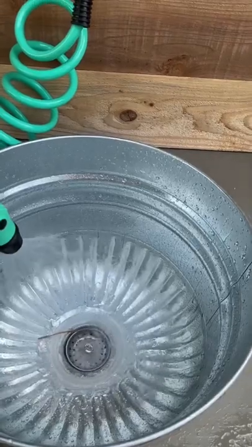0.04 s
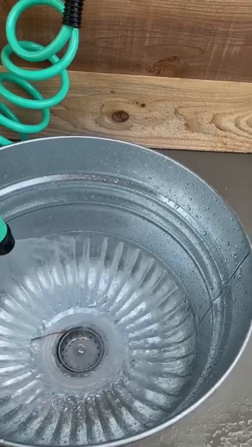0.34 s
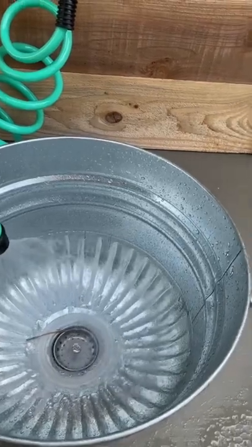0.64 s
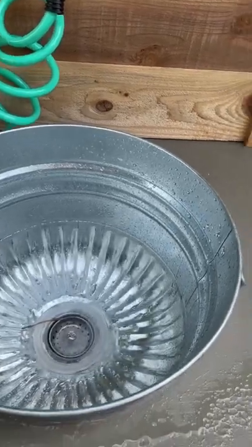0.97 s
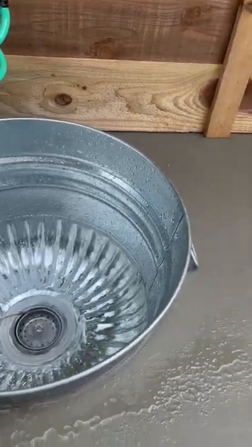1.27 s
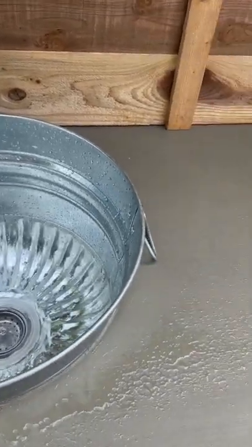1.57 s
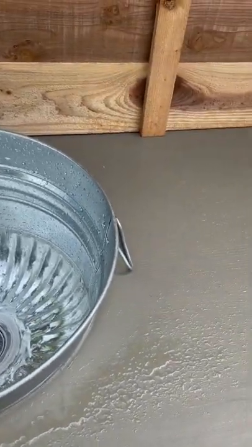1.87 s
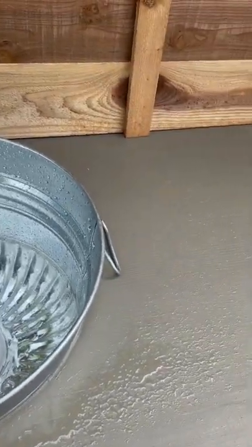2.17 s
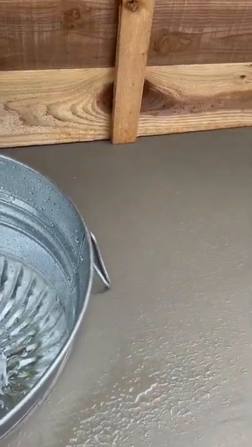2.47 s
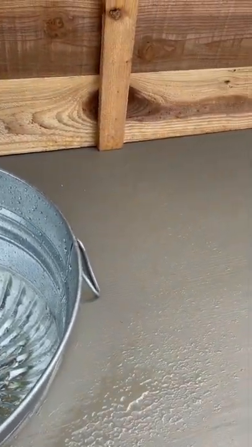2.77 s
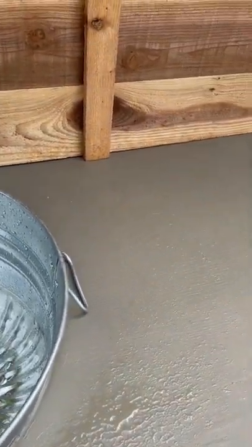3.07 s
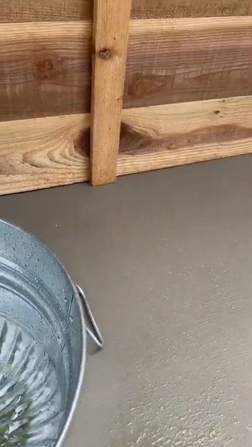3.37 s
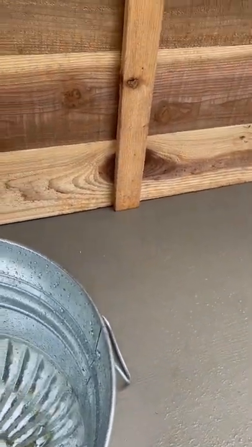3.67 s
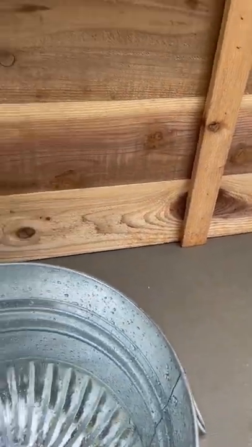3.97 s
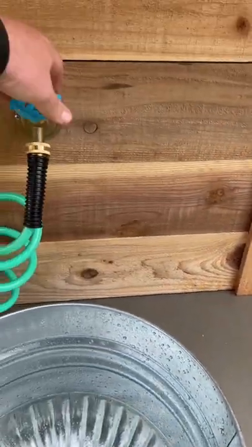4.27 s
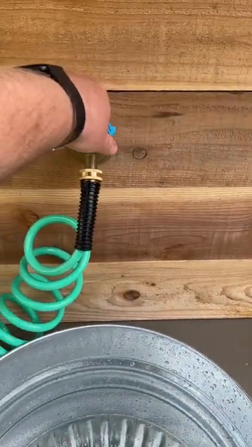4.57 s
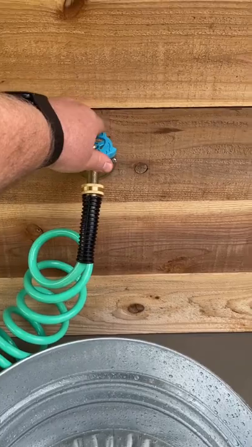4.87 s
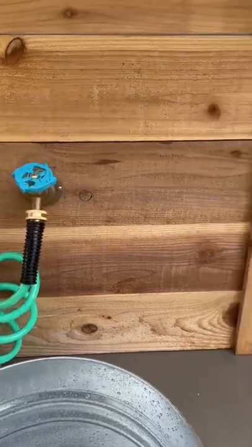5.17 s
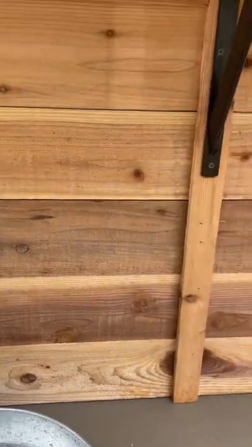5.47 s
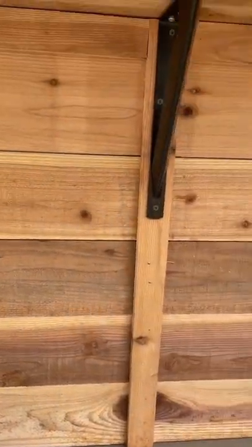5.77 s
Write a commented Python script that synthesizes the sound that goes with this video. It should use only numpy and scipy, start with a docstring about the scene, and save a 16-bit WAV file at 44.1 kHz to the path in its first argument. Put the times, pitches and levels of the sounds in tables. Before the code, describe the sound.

Water from a hose drums and hisses in a metal tub, then stops; the nozzle clacks and clatters on wood, followed by softer knocks.

```python
"""Hosing a tub in a shed

Water drums and hisses on a galvanised tub in a wooden shed. The jet is shut off, bubbles fizz on the wet
metal and faint breathy hisses come and go. The nozzle clacks, is let go and clatters against the boards,
jarring the tub; softer knocks and clicks follow as hose and tap are handled. A low outdoor rumble lies
under it all, heard through a small microphone with two openings."""
import sys
import numpy as np
from scipy import signal
from scipy.fft import rfft, irfft, next_fast_len
from scipy.io import wavfile
from scipy.ndimage import map_coordinates

SR = 44100
rng = np.random.default_rng(int(sys.argv[2]) if len(sys.argv) > 2 else 0)


def put_to_file(sound):
    """Save the sound as 16-bit audio at rate SR, in the file named by the first command-line argument."""
    columns = np.atleast_2d(sound).T  # one column per channel
    safe = np.clip(columns, -1, 1)
    whole_steps = np.round(safe * 32767)
    wavfile.write(sys.argv[1], SR, whole_steps.astype(np.int16))


N = 257544
TIME = np.arange(N) / SR

# the notes of the tub bottom (pitch [Hz], width [Hz], level [dB])
TUB_NOTES = [(366, 46, -11.5), (432, 24, -12), (479, 22, -9.5), (589, 26, -4.5), (874, 23, -17),
             (968, 34, 2.5), (1065, 35, -5), (1183.5, 40, 6.5), (1410, 54, -14.5), (1520, 20, -4.5),
             (1634, 30, -7), (1727, 88, -4.5), (1954, 29, -4), (2108, 24, -4), (2194, 26, -5),
             (2301, 12, -7), (2490, 34.5, -4), (3024, 35, -14.5), (3770, 35, -12)]
# tone colours: how strong each sound is from low to high (frequency [Hz], level [dB])
DRUM_COLOUR = [(50, -27), (110, -4), (220, -11), (420, -4.5), (700, -6), (950, -2.5), (1250, -5),
               (1450, -1.5), (2100, -7.5), (3200, -29), (6000, -18), (16000, -25)]  # drops on metal
SPLASH_COLOUR = [(200, -13.5), (1000, -10), (2500, 0.5), (5000, 0), (7000, -3), (9500, -0.5), (13000, -2.5),
                 (15600, 4.5)]  # drops bursting
CLACK_COLOUR = [(100, 3), (400, -2), (900, 1), (1400, 5), (2300, 4.5), (3100, 2.5), (6000, -8), (9500, -14),
                (13000, -16), (15600, -23)]  # the nozzle striking
LANDING_COLOUR = [(400, 0), (1500, 5.5), (4300, 4.5), (6200, -12.5), (10000, -10), (15600, -22)]  # the nozzle landing
THUD_COLOUR = [(70, -13), (150, 1.5), (320, 1.5), (480, -3), (750, -16), (1400, -17.5), (3000, -29),
               (9000, -51)]  # the dull part of a hit
TICK_COLOUR = [(300, -24), (900, 0), (1400, 10), (1700, -3), (2050, 3), (3200, -12), (5500, -16.5),
               (9500, -21.5), (15600, -25)]  # the sharp part of a hit on wood
RUSH_COLOUR = [(800, -3), (1600, -10), (2300, -2.5), (2750, -6), (3200, -7.5), (4000, -4.5), (4700, -10),
               (5600, -16), (12000, -34)]  # the airy rush of the breathy hiss
RUMBLE_COLOUR = [(20, -10.5), (45, -9), (74, 4.5), (92, -7.5), (120, -0.5), (165, -11.5), (300, -24),
                 (700, -40.5), (2000, -71.5)]  # the outdoor rumble
AIR_COLOUR = [(100, 3), (400, -1), (1100, 1), (1800, -3), (2500, -10.5), (4000, -12), (6000, -20),
              (8500, -36), (11000, -41), (15500, -36)]  # the outdoor air

# hard hits of the nozzle and fittings
# (time [s], relative level [dB], rattle [s], treble slope [dB per octave], thud gain [dB], rise [s])
NOZZLE_HITS = [(0.888, -27, 0.004, -6, -7.5, 0.00079), (0.8952, -25, 0.0024, -3, -11, 0.0004),
               (1.105, -43.5, 0.003, 0, -26, 0.0008), (1.936, -32, 0.007, -6.5, -12.5, 0.0006),
               (2.0653, -16.5, 0.0084, 1.5, -12, 0.001), (2.349, -35, 0.002, 3, -6, 0.00085),
               (3.408, -42, 0.017, -11, 3.5, 0.0072), (3.461, -38.5, 0.016, -10, -6, 0.0047),
               (4.174, -40, 0.0051, -12, -7, 0.0025), (4.824, -52, 0.001, 5, -20, 0.0002),
               (5.446, -46.5, 0.042, 2.5, -11, 0.0027)]
# the dropped nozzle lands and tumbles (time [s], level [dB], rattle [s], rise [s])
TUMBLES = [(2.627, -27, 0.0053, 0.00084), (2.634, -21.5, 0.013, 0.0012), (2.659, -29, 0.008, 0.0009),
           (2.673, -29.5, 0.0026, 0.00071)]
# the notes of the boards and tub that it jars (pitch [Hz], width [Hz], level [dB])
JARRED_NOTES = [(353, 25, 5.5), (445, 16, 11), (606, 64, -0.5), (884, 100, -0.5), (1185, 110, -5),
                (1690, 47, -4.5), (2090, 30, 1.5), (2310, 80, -8.5), (2680, 130, -13), (3310, 70, -10),
                (3690, 70, -5), (3890, 110, -14)]
# blows on the boards
# (time [s], knock gain [dB], boom gain [dB], boom centre [Hz], knock centre [Hz], tick level [dB])
BOARD_HITS = [(1.248, -37, -43, 79.7, 378, -69), (1.422, -30.5, -35, 145, 320, -46),
              (1.493, -25.5, -35, 170, 338, -43.5), (1.747, -37.5, -56, 79, 323, -50),
              (2.629, -17, -3, 168, 190, -48), (2.794, -31, -35.5, 149, 409, -48.5),
              (3.396, -31.5, -32.5, 137, 537, -46.5), (3.48, -32.5, -36, 98, 537, -50),
              (3.527, -35, -27.5, 79, 348, -56), (3.739, -23, -20, 123, 259, -34),
              (3.814, -33, -30, 130, 507, -41), (3.847, -32.5, -24, 79, 440, -66),
              (4.16, -36, -18.5, 57, 286, -50), (4.447, -35.5, -48, 150.3, 436, -53),
              (5.451, -33.5, -39, 100, 470, -56), (5.462, -32, -32.5, 70, 474, -55),
              (5.479, -37.5, -32, 70, 505, -62), (5.496, -40.5, -41, 75, 480, -61)]
# small metal contacts (time [s], level [dB])
WHEEL_SLIPS = [(4.636, -50), (4.655, -50), (4.705, -45), (4.722, -46), (4.739, -45), (4.754, -43),
               (4.825, -40), (4.842, -44), (4.852, -42)]  # the tap wheel sticks and slips
COUPLING_HITS = [(5.451, -50), (5.466, -50), (5.492, -50)]  # the brass hose coupling is jogged
# the notes each object rings with when struck (pitch [Hz], level [dB], time to fade by 60 dB [s])
NOZZLE_NOTES = [(889, 4, 0.042), (1022, 1.5, 0.033), (1252, -14, 0.34), (1765, -5.5, 0.075),
                (2790, -6, 0.083), (2955, 0.5, 0.053), (3290, -2, 0.069), (4085, -4.5, 0.064),
                (4350, -11, 0.12), (4810, -11, 0.073), (5600, -5, 0.063), (6040, -12.5, 0.071)]
BOARD_NOTES = [(247.6, -1.5, 0.12), (295, 3, 0.12), (353.7, 0, 0.12), (442, -11.5, 0.1), (508, -17, 0.022),
               (580, -5.5, 0.097)]
WALL_NOTES = [(69, -9.5, 0.79), (95.4, 4.5, 0.26), (125.8, 5.5, 0.18), (184, 3.5, 0.091)]
WHEEL_NOTES = [(632, -1, 0.014), (1210, -1, 0.015), (1370, 3.5, 0.014), (2120, -9, 0.01)]
COUPLING_NOTES = [(1850, -11, 0.07), (2540, -0.5, 0.082), (2990, -13, 0.07), (5700, -8, 0.05)]

# a hand strokes the hose and tap wheel (strongest moment [s], length [s], level [dB])
HAND_STROKES = [(1.197, 0.041, -49.5), (1.634, 0.069, -46), (1.937, 0.26, -47), (2.144, 0.038, -49),
                (2.353, 0.34, -51), (3.456, 0.081, -53), (4.713, 0.26, -54.5), (4.858, 0.05, -52.5),
                (5.305, 0.65, -63)]
# spells of breathy hiss (start [s], length [s], level [dB], pitch [Hz], hoarseness [times the base width])
HISS_SPELLS = [(1.13, 0.51, -54.5, 3540, 0.87), (1.792, 0.2, -67, 3200, 1.8), (3.45, 0.4, -69, 3940, 2.7),
               (4.183, 0.42, -74.5, 4290, 1.5), (4.928, 0.32, -67, 3820, 1.2),
               (5.267, 0.16, -64, 3830, 3.2)]
# the resonances of the breathy hiss
# (frequency [times the pitch], base width [Hz], level [dB], glide [share of frequency])
BREATHY_RESONANCES = [(0.532, 120, 5, -0.07), (0.665, 218, -13, 0), (0.999, 113.5, 6, 0.03),
                      (1.24, 100, -10, 0.02), (1.385, 120, -1, 0.087)]
# the rise and fall of the outdoor rumble (time [s], relative level [dB])
RUMBLE_LEVELS = [(0, -41), (2.4, -44.5), (3.3, -45.5), (3.95, -37), (4.45, -45), (5.84, -51)]
# the shed's echo (frequency [Hz], time to fade by 60 dB [s])
SHED_ECHO = [(150, 0.17), (1000, 0.22), (3000, 0.13), (10000, 0.032)]
# how alike the microphone's two sides are (frequency [Hz], likeness [0 to 1])
MIC_LIKENESS = [(60, 1), (140, 1), (280, 0.98), (640, 0.43), (1400, 0.14), (3100, 0.056), (5400, 0.59),
                (6600, 0.84), (7200, 1)]
# how much louder its left side is (frequency [Hz], left minus right [dB])
MIC_BALANCE = [(60, -0.1), (200, 2), (380, 2), (680, 6.5), (950, 9.5), (1350, 3), (2400, 1), (4400, 0)]
# how far its left side runs ahead (frequency [Hz], phase [radians])
MIC_LEAD = [(500, 0), (950, -.5), (2400, 0.5), (4300, 1.2), (5300, 1), (6300, 1.57), (7400, np.pi),
            (11000, 2 * np.pi), (14400, 3 * np.pi), (15700, 10.5)]

EASE_S, SHUT_S = 0.59, 0.9  # the trigger starts to ease; the jet is shut


def spray():
    """Thousands of drops drum on the sheet metal and burst into a spattering hiss."""
    easing = np.maximum(TIME - EASE_S, 0) / (SHUT_S - EASE_S)
    fade_db = -16.5 * easing ** 2 - 250 * np.maximum(TIME - SHUT_S, 0)  # the last drops die out fast
    impacts = drops(rate=3000) * amp(1.2 * wobble(28.2))
    # each note swells and sinks as the jet strays over the metal
    ring = sum(amp(db + 1.7 * wobble(9.3)) * np.sqrt(width) * resonated(impacts, [(hz, width, 0)])
               for hz, width, db in TUB_NOTES)
    ring = amp(-0.2 + 0.45 * fade_db) * unit(ring)  # a weaker jet rings the metal less
    drumming = amp(-5) * coloured(drops(rate=2500), DRUM_COLOUR)
    narrow = amp([[0], [-5]])  # the tub is compact, so less of it goes to the sides
    tub = amp(-26.5 + fade_db) * narrow * (ring + drumming)
    spatter = drops(rate=22000) * amp(2.1 * wobble(350))  # the jet breaks up in clumps
    splash = amp(-25.5 + 1.58 * fade_db) * coloured(spatter, SPLASH_COLOUR)
    return in_shed(tub, wet_db=-15.5) + in_shed(splash, wet_db=-5.5)


def clacks():
    """The nozzle and its fittings strike: a short rattling crack, the nozzle's ring and a dull thud."""
    out, t = np.zeros((2, N)), np.arange(SR // 2) / SR
    for s, level_db, rattle, slope, thud_db, rise in NOZZLE_HITS:
        chatter = amp(-60 * np.maximum(t - rattle, 0) / 0.096)  # loose parts rattle, then settle
        treble_db = lambda hz: slope * np.log2(max(hz / 2000, 1))  # softer hits lose treble
        colour = [(hz, db + treble_db(hz)) for hz, db in CLACK_COLOUR]
        notes = [(hz, db + min(treble_db(hz), 0), fade_s) for hz, db, fade_s in NOZZLE_NOTES]
        crack = amp(-11.5) * coloured(noise(len(t)), colour) * chatter
        ring = amp(-12) * ringing(notes, t)
        thud = amp(thud_db) * coloured(noise(len(t)), THUD_COLOUR) * chatter
        hit = amp(level_db) * (crack + ring + thud) * onset(t, rise)
        add(out, s, in_shed(hit, wet_db=-8.5))
    return out


def landing():
    """The dropped nozzle clatters against the boards; the tub beside it is jarred and rings hollow."""
    out, t = np.zeros((2, N)), np.arange(SR // 2) / SR
    for s, db, rattle, rise in TUMBLES:
        settling = np.maximum(t - rattle, 0)
        hollow = resonated(noise(len(t)), JARRED_NOTES) * amp(-60 * settling / 0.1)
        crack = coloured(noise(len(t)), LANDING_COLOUR) * amp(-5 - 60 * settling / 0.07)
        add(out, s, in_shed(amp(db) * (hollow + crack) * onset(t, rise), wet_db=-9.5))
    return out


def blows(rebound_s=0.024, rebound_db=-21.5):
    """A blow knocks one board, sets the whole wall booming and lands again more lightly."""
    out, t = np.zeros((2, N)), np.arange(SR // 2) / SR
    for s, knock_db, boom_db, boom_hz, knock_hz, tick_db in BOARD_HITS:
        hit = knock(t, knock_hz, knock_db, tick_db)
        hit[0] += amp(boom_db) * boom(t, boom_hz)  # in the centre only
        add(out, s, hit)
        add(out, s + rebound_s, amp(rebound_db) * knock(t, knock_hz, knock_db, tick_db))
    return out


def knock(t, centre_hz, knock_db, tick_db):
    """One hit on a board: a dull thud, the board's ring and a tick."""
    notes = [(hz, db + favoured(hz, centre_hz), fade_s) for hz, db, fade_s in BOARD_NOTES]
    colour = [(hz, db + favoured(hz, centre_hz) / 2) for hz, db in THUD_COLOUR]
    thud = coloured(noise(len(t)), colour) * amp(-4 - 60 * t / 0.056)
    ring = amp(-8.5) * ringing(notes, t)
    tick = coloured(noise(len(t)), TICK_COLOUR) * amp(tick_db - 60 * t / 0.045)
    hit = amp(knock_db) * (thud + ring) + tick
    return in_shed(hit * onset(t, 0.00085), wet_db=-7)


def boom(t, centre_hz):
    """The plank wall's low notes; a softer hit favours the lower ones."""
    bent = t + 0.0068 * onset(t, 0.0065)  # high ripples in the wood arrive first, so the pitch falls
    notes = [amp(db + favoured(hz, centre_hz) - 60 * t / fade_s) * np.sin(2 * np.pi * hz * bent)
             for hz, db, fade_s in WALL_NOTES]
    return sum((-1) ** (k + 1) * note for k, note in enumerate(notes)) * onset(t, 0.019)


def clinks():
    """The tap wheel ticks as it turns; the brass coupling rings as the hose swings against the wall."""
    out, t = np.zeros((2, N)), np.arange(SR // 2) / SR
    for contacts, notes in (WHEEL_SLIPS, WHEEL_NOTES), (COUPLING_HITS, COUPLING_NOTES):
        for s, db in contacts:
            add(out, s, amp(db) * ringing(notes, t) * onset(t, 0.00069))
    return out


def rubbing(between_strokes_db=-62.5):
    """Skin and rubber slide in tiny uneven slips; each stroke swells and dies away."""
    strokes = sum(amp(db) * np.exp(-(2 * (TIME - s) / length) ** 2) for s, length, db in HAND_STROKES)
    slips = drops(rate=4000) * amp(2.2 * wobble(45))
    colour = [(100, 4.5), (350, 13.5), (800, 2.5), (1400, -1.5), (2200, -4), (3400, -12.5),
              (6000, -22), (15000, -35.5)]
    return np.hypot(strokes, amp(between_strokes_db)) * coloured(slips, colour)


def breathy_hisses(ramp_s=0.07, swell_db=15):
    """Faint, breath-like hisses: airy gliding tones swell out of a hoarse rush."""
    out = np.zeros((2, N))
    for s, length, db, pitch, hoarse in HISS_SPELLS:
        t = np.arange(round(length * SR)) / SR
        progress = t / length
        fade = np.clip(t / ramp_s, 0, 1) * np.clip((length - t) / ramp_s, 0, 1)
        tones = 0
        for multiple, width, tone_db, glide in BREATHY_RESONANCES:
            steady = resonated(noise(SR), [(multiple * pitch, hoarse * width, 0)])
            position = np.cumsum(1 + glide * (progress - 0.5))  # reading faster raises the pitch
            gliding = np.array([map_coordinates(row, [position]) for row in steady])
            tones = tones + amp(tone_db) * np.sqrt(width) * gliding
        swelling = unit(tones) * amp(swell_db * (progress - 0.5))
        rush = amp(-0.5) * coloured(noise(len(t)), RUSH_COLOUR)
        add(out, s, amp(db + 0.94 * wobble(13.6)[:len(t)]) * fade * (swelling + rush))
    return out


def fizz(fall_db_per_s=12):
    """Tiny bubbles burst in the film of water, ever fainter as it runs to the drain."""
    level_db = -55.5 - fall_db_per_s * np.maximum(TIME - SHUT_S, 0)
    colour = [(500, -48), (2000, 0), (5000, -4.5), (10000, -5), (15500, -5)]
    return amp(level_db) * coloured(drops(rate=12000), colour)


def tap(closed_s=4.64):
    """Water under pressure sings thinly in the tap and gets quieter as the wheel is closed."""
    closing = np.clip((TIME - closed_s) / 0.5 + 1, 0, 1)
    colour = [(7000, -39.5), (8800, -8.5), (9500, 2), (10400, -13), (13000, -25.5)]
    return amp(-79.5 - 5 * closing + 2.1 * wobble(3.2)) * coloured(noise(N), colour)


def outdoors():
    """A wavering low rumble and faint outdoor air."""
    rumble_db = np.interp(TIME, *np.transpose(RUMBLE_LEVELS)) + 1
    rumble = amp(rumble_db + 0.54 * wobble(8.4)) * coloured(noise(N), RUMBLE_COLOUR)
    air = amp(-58.5 + 0.3 * wobble(11)) * coloured(noise(N), AIR_COLOUR)
    return rumble + air


def in_shed(hit, wet_db):
    """A sound plus its echo off the wooden walls; wet_db sets how loud the echo is."""
    hz, t, spectrum = signal.stft(noise(SR // 2), SR, nperseg=256)
    tail = signal.istft(spectrum * amp(-60 * t / along(SHED_ECHO, hz)[:, None]), SR, nperseg=256)[1]
    echo = signal.fftconvolve(hit, tail / np.linalg.norm(tail[0]), axes=1)
    return hit + amp(wet_db) * echo[:, :hit.shape[1]]


def ringing(notes, t):
    """Fading notes, struck a little differently each time."""
    return sum(amp(db + rng.normal(0, 2.66) - 60 * t / fade_s)
               * np.sin(2 * np.pi * (hz * t + rng.random((2, 1)))) for hz, db, fade_s in notes)


def favoured(hz, centre_hz):
    """Gain in dB: a hit drives the frequencies around its centre most."""
    return -7 * np.log2((hz + 1) / centre_hz) ** 2


def onset(t, rise_s):
    """A smooth climb from 0 to 1."""
    return 1 - np.exp(-t / rise_s)


def amp(db):
    """Turn decibels into a multiplier."""
    return 10 ** (np.asarray(db) / 20)


def unit(x):
    """Scale to an average strength (rms) of 1."""
    return x / np.sqrt(np.mean(x ** 2) + 1e-20)


def along(points, hz):
    """Read between (frequency, value) points, with octaves evenly spaced."""
    f, v = np.transpose(points)
    return np.interp(np.log(hz + 1), np.log(f + 1), v)


def wobble(rate):
    """A smooth curve through rate random values a second."""
    return map_coordinates(rng.standard_normal(int(N * rate / SR) + 4), [np.arange(N) * rate / SR])


def filtered(x, response):
    """Multiply each frequency in x by response(frequency)."""
    n = x.shape[-1]
    padded = next_fast_len(n + 8192)
    return irfft(rfft(x, padded) * response(np.fft.rfftfreq(padded, 1 / SR)), padded)[..., :n]


def coloured(x, colour):
    """Give x a tone colour, at strength 1."""
    return unit(filtered(x, lambda hz: amp(along(colour, hz))))


def resonated(x, notes):
    """Let x ring at the given notes, at strength 1; narrow notes ring longer."""
    response = lambda f: sum(amp(db) * 1j * f * width / (hz * hz - f * f + 1j * f * width)
                             for hz, width, db in notes)
    return unit(filtered(x, response))


def noise(size):
    """Two unrelated white noises: one for the centre, one for the sides."""
    return rng.standard_normal((2, size))


def drops(rate):
    """Clicks of random size at random moments, about rate a second."""
    return unit((rng.random((2, N)) < rate / SR) * noise(N))


def add(track, s, sound):
    """Mix a sound in at s seconds."""
    start = round(s * SR)
    track[:, start:start + sound.shape[-1]] += sound[..., :N - start]


def scene():
    """All sources, spread to left and right: bass and top treble reach both sides alike."""
    hissing = spray() + fizz() + breathy_hisses() + tap()
    handling = rubbing() + clacks() + landing() + clinks() + blows()
    spread = lambda hz: np.arccos(np.clip(along(MIC_LIKENESS, hz), -1, 1)) / 2
    shares = lambda hz: np.array([np.cos(spread(hz)), np.sin(spread(hz))])
    centre, side = filtered(hissing + handling + outdoors(), shares)
    return np.array([centre + side, centre - side])


def record(dry, low_hz=45, top_hz=15850):
    """The microphone's two openings differ in level and timing; deep bass and the very top are cut."""
    half = np.array([[0.5], [-0.5]])  # left and right each take half the difference
    balance = lambda hz: amp(half * along(MIC_BALANCE, hz))
    lead = lambda hz: np.exp(1j * half * np.interp(hz, *np.transpose(MIC_LEAD)))
    bass_cut = signal.sosfilt(signal.butter(2, low_hz, 'highpass', fs=SR, output='sos'), dry)
    return filtered(bass_cut, lambda hz: balance(hz) * lead(hz) / (1 + (hz / top_hz) ** 300))


dry = scene()
out = record(dry)
put_to_file(out)
```